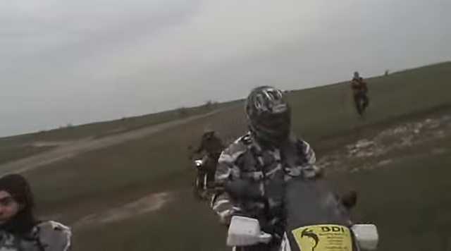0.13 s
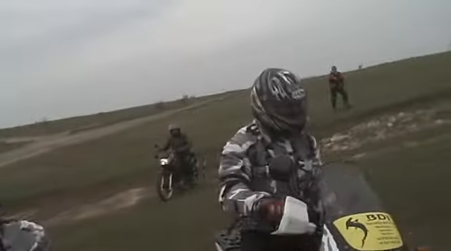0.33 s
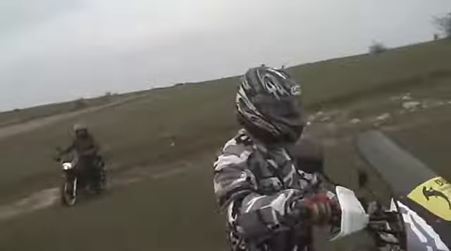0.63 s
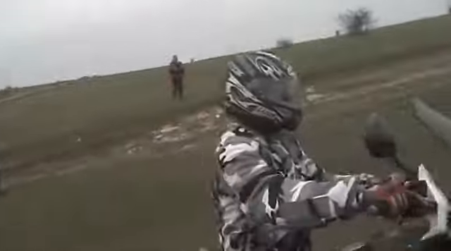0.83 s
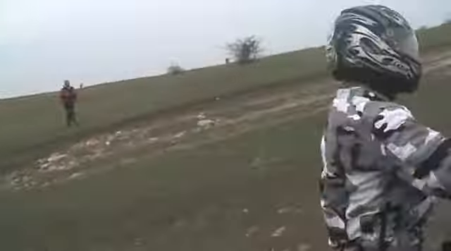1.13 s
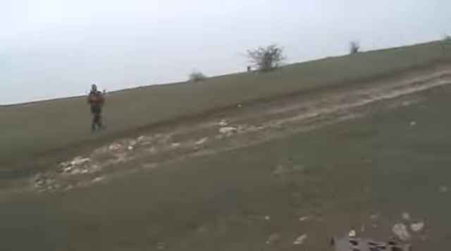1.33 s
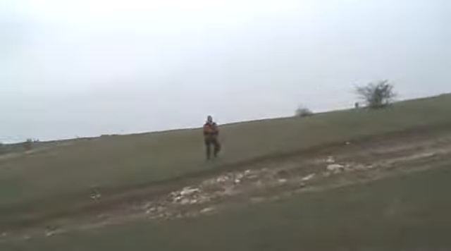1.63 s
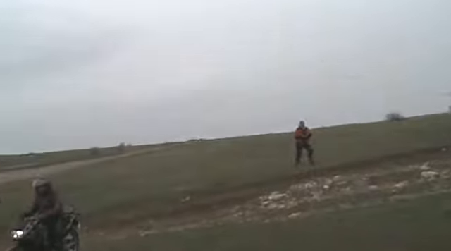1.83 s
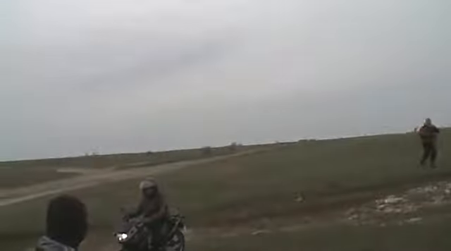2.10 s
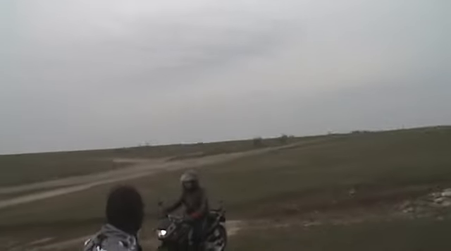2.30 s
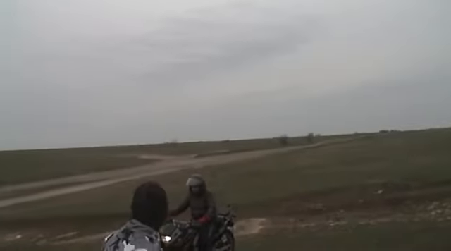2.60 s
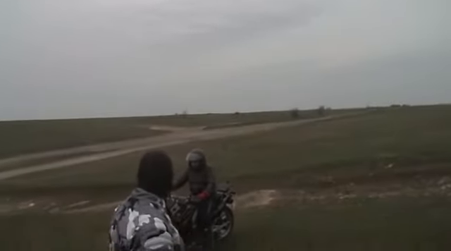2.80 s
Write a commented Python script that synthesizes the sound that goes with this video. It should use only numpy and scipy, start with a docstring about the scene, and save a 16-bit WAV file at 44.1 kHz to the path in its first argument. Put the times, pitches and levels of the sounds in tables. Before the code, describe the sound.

Slow single-cylinder motorbike chugging by in open country, with heavy gusts thumping and flapping the mic

```python
"""A single-cylinder motorcycle rolls past at a slowing idle on an open dirt track, other engines droning behind.
Each firing rings the exhaust pipe and swells a rasp of coloured noise; a narrow band rings, and ticks rattle.
Gusty wind buffets a small bare microphone: noise makes the low rumble and the fluttering eddies,
short swings make the flaps, and coloured clicks stand for the input overloading in the strongest gusts.
A faint hiss near 8 kHz, made of noise, lies in the background."""
import sys
import numpy as np
from scipy import signal
from scipy.fft import rfft, irfft, next_fast_len
from scipy.io import wavfile
from scipy.ndimage import uniform_filter1d

SR = 44100
rng = np.random.default_rng(int(sys.argv[2]) if len(sys.argv) > 2 else 0)


def to_wav(s):
    """Save 16-bit WAV."""
    ch = np.atleast_2d(s).T  # columns
    pcm = np.round(np.clip(ch, -1, 1) * 32767)  # PCM
    wavfile.write(sys.argv[1], SR, pcm.astype(np.int16))


def level_to_linear(level):
    """Convert decibel levels to linear amplitude factors, elementwise."""
    exponent = np.asarray(level, float) / 20
    return 10 ** exponent


N = 130095  # length in samples

# the bike passing, and the background hiss:
# time_s, thump_db, rasp_db, treble_db, background_hiss_db (levels before the trims added in use)
LEVELS = [(0.0, -46, -50.5, -61, -58), (0.19, -27, -51.5, -66.5, -64.5), (0.34, -27, -49, -70.5, -65),
          (0.51, -27, -44.5, -58, -63.5), (0.71, -27, -44.5, -59, -62.5), (0.93, -29, -42, -61.5, -62),
          (1.18, -27, -45, -60, -62.5), (1.39, -26.5, -43.5, -64, -58), (1.53, -26, -46.5, -57.5, -56.5),
          (1.71, -32, -45.5, -54.5, -65), (1.86, -26, -49, -56.5, -65.5),
          (2.09, -36.5, -51.5, -55.5, -65.5), (2.32, -35, -54, -56.5, -72), (2.72, -17, -54, -62, -66.5),
          (2.85, -28.5, -55.5, -62.5, -64.5), (2.95, -45, -53, -63, -64)]


def rms_one(x):
    """Scale a signal to an average strength (rms) of 1."""
    return x / np.sqrt(np.mean(x ** 2) + 1e-20)


def in_time(rows):
    """Draw straight lines between the rows of a table: one curve per column after the time."""
    time_s, *columns = np.transpose(rows)
    return [np.interp(np.arange(N) / SR, time_s, column) for column in columns]


def drift(rate_hz):
    """Random wandering of spread 1: noise smoothed twice, made at a twentieth of the sample rate."""
    r = np.exp(-40 * np.pi * rate_hz / SR)
    noise = rng.standard_normal(N // 20 + 3002)
    slow = signal.lfilter([1], [1, -2 * r, r * r], noise)[3000:]  # leave out the settling
    return np.interp(np.arange(N) / 20, np.arange(len(slow)), rms_one(slow))


def colour(x, spectrum):
    """Give a sound the spectrum of a table, falling steeply beyond its ends; white noise keeps rms 1."""
    size = next_fast_len(N + SR // 2)
    hz = np.maximum(np.arange(size // 2 + 1) * SR / size, 1)
    table_hz, level_db = np.transpose(spectrum)
    octaves_beyond = np.log2(np.maximum(hz / table_hz[-1], 1) * np.maximum(table_hz[0] / hz, 1))
    gain_db = np.interp(np.log(hz), np.log(table_hz), level_db) - 13.9 * octaves_beyond
    return irfft(rfft(x, size) * rms_one(level_to_linear(gain_db)), size)[:N]


def clicks(time_s, sizes):
    """Place single samples at given times; the tiny value elsewhere is inaudible."""
    out = np.full(N, 1e-18)
    i = (np.asarray(time_s) * SR).astype(int)
    inside = (i >= 0) & (i < N)
    out[i[inside]] = np.asarray(sizes)[inside]
    return out


def ring(x, hz, t60_s):
    """A resonance: a click of size 1 sets a sine of height 1 ringing, 60 dB weaker after t60_s."""
    r, w = level_to_linear(-60 / (t60_s * SR)), 2 * np.pi * hz / SR
    return signal.lfilter([0, np.sin(w)], [1, -2 * r * np.cos(w), r * r], x)


def band(x, low_hz, high_hz):
    """Pass only one band; a click of size 1 comes out with height 1."""
    sos = signal.butter(2, [low_hz, high_hz], "band", fs=SR, output="sos")
    height = np.max(np.abs(signal.sosfilt(sos, signal.unit_impulse(500))))
    return signal.sosfilt(sos, x) / height


def evened(x, span_s, share):
    """Take out a share of the chance swings of level over a span, and scale to rms 1."""
    size = int(span_s * SR)
    power = uniform_filter1d(uniform_filter1d(rms_one(x) ** 2, size), size)
    return rms_one(x / (power + .05) ** (share / 2))


def firings():
    """One click per firing of the cylinder, at ever longer intervals with slight chance in time and size."""
    k = np.arange(-6, 24)  # counted from the firing at 0.482 s
    chance = rng.normal(0, 1, (len(k), 2))
    # each interval is 2 * slowing_s longer than the one before
    first_s, period_s, slowing_s = .482, .0868, .00102
    jitter_s, spread_db = .002, 0.5
    time_s = first_s + k * (period_s + slowing_s * k) + jitter_s * chance[:, 0]
    return clicks(time_s, level_to_linear(spread_db * chance[:, 1]))


def exhaust_thump(blows):
    """Each firing strikes the air in the exhaust pipe, which rings at its own pitches; rms 1."""
    # ways the pipe rings: pitch_hz, level_db (relative), t60_s
    pipe = [(47.6, 2, 0.033), (90.34, 0.5, 0.36), (109, -5.5, 0.15), (149.4, -25.5, 0.51)]
    return rms_one(sum(level_to_linear(db) * ring(blows, hz, t60_s) for hz, db, t60_s in pipe))


def puff_shapes(blows):
    """A smooth bump of height about 1 around each firing, to move the level of the noise."""
    width_s = 0.015
    t = np.arange(-4 * width_s, 4 * width_s, 1 / SR)
    return signal.fftconvolve(blows, np.exp(-.5 * (t / width_s) ** 2), "same")


def engine_rasp(puffs, rasp_db):
    """Flickering noise for the drone of the engines, with casing resonances and a puff of hiss per firing."""
    # colour of the rasp: pitch_hz, level_db (relative, per Hz)
    rasp_colour = [(250, -12), (400, -6), (600, 0), (800, -5.5), (1050, -7.5), (1400, -8.5), (1800, -12),
                   (2200, -13), (2700, -19), (3300, -28.5), (4500, -33.5)]
    # casing resonances: pitch_hz, width_hz, level_db (when the rasp is strongest),
    # extra_db (further change for each dB that the rasp changes)
    casing = [(1450, 160, -12, .1), (2250, 250, -14, .3)]
    body = colour(rng.standard_normal(N) * level_to_linear(1.6 * drift(120)), rasp_colour)
    for hz, width_hz, db, extra_db in casing:
        resonance = rms_one(ring(rng.standard_normal(N), hz, 1.3 / width_hz))
        body = body + level_to_linear(db + extra_db * (rasp_db - rasp_db.max())) * resonance
    puff_gain = 1 + puffs * (level_to_linear(3) - 1)  # about 3 dB louder at each firing
    return body * puff_gain * level_to_linear(rasp_db + 4.5 + 1.6 * drift(25))


def flickering_noise(puffs):
    """White noise that flickers in level and dips very slightly at each firing."""
    return rng.standard_normal(N) * level_to_linear(2.0 * drift(60)) * (1 + puffs * (level_to_linear(-0.5) - 1))


def engine_treble(noise, treble_db):
    """The bright part of the engine: flickering noise given the colour of the treble."""
    # colour of the treble: pitch_hz, level_db (relative, per Hz)
    treble_colour = [(3300, 5), (4500, -1), (5500, -4.5), (6300, -13), (7200, -8)]
    return colour(noise, treble_colour) * level_to_linear(treble_db - 1.6)


def exhaust_barks():
    """A harder, brighter bark of the exhaust: coloured noise that rises, holds and dies away quickly."""
    # barks: start_s, hold_s (from the start, rise included), level_db
    bark_times = [(0.831, 0.024, -33), (0.918, 0.017, -46), (1.024, 0.014, -43.5), (1.337, 0.017, -48)]
    # colour of a bark: pitch_hz, level_db (relative, per Hz)
    bark_colour = [(500, -10), (900, 2.5), (1600, 1.5), (2500, -5.5), (3800, -12.5), (5000, -33),
                   (8500, -25)]
    attack_s, release_s = 0.0038, .005
    t = np.arange(N) / SR
    level = np.zeros(N)
    for start_s, hold_s, db in bark_times:
        rise = np.clip((t - start_s) / attack_s, 0, 1)
        decay = np.exp(-np.maximum(t - start_s - hold_s, 0) / release_s)
        level += level_to_linear(db) * rise * decay
    return level * colour(rng.standard_normal(N), bark_colour)


def engine(blows, puffs, noise):
    """Thump, rasp and treble, whose levels follow the bike passing, and the barks."""
    thump_db, rasp_db, treble_db, _ = in_time(LEVELS)
    thump = exhaust_thump(blows) * level_to_linear(thump_db + 1.5)
    return thump + engine_rasp(puffs, rasp_db) + engine_treble(noise, treble_db) + exhaust_barks()


def ringing():
    """A narrow ringing band and one above it: slow noise swings the strength and phase of two moving tones."""
    # loudest beside the microphone, sinking as the bike leaves: time_s, level_db, pitch_hz
    ringing_path = [(0, -53, 830), (.42, -41, 827.8), (.52, -41, 830), (.57, -37, 865), (.63, -39.5, 880),
                    (.7, -40, 900), (.77, -38.5, 845), (.85, -39, 830), (.89, -54, 807.6),
                    (.92, -32.5, 850.5), (.96, -39, 816.4), (1.0, -49, 799.5), (1.04, -34.5, 884.4),
                    (1.09, -45.5, 782.3), (1.15, -37.5, 789), (1.2, -65, 761), (1.245, -44.5, 737),
                    (1.3, -57, 739.5), (1.36, -39, 725), (1.42, -54.5, 717.6), (2.95, -58, 693.5)]
    level_db, hz = in_time(ringing_path)
    out = 0
    for ratio, db in ((1, 0), (1.97, -9)):  # pitch ratio, level in dB relative to the first
        turn = 2 * np.pi * ratio * np.cumsum(hz) / SR
        rate_hz = 54 * ratio  # speed of the swings: faster makes a wider band
        tone = drift(rate_hz) * np.cos(turn) + drift(rate_hz) * np.sin(turn)
        out = out + level_to_linear(db) * evened(tone, .025, 0.34)
    return out * level_to_linear(level_db)


def ticks():
    """Bright single ticks from the passing bike among a fainter regular rattle: clicks in a high band."""
    # ticks: time_s, peak_db (before 4.5 dB is added)
    tick_times = [(1.504, -38), (1.5295, -34.5), (1.5596, -32), (1.597, -59), (1.6736, -44), (1.6914, -47),
                  (1.712, -50)]
    time_s, peak_db = np.transpose(tick_times)
    beats_s = np.arange(1.45, 1.85, 1 / 54)  # 54 beats per second
    beat_db = -46 + 3.2 * rng.normal(0, 1, len(beats_s))
    rattle = clicks(beats_s, level_to_linear(beat_db))
    return band(clicks(time_s, level_to_linear(peak_db + 4.5)) + rattle, 5600, 9500)


def wind_rumble():
    """Wind pressing on the microphone: low noise whose level rises and falls in lumps."""
    # gusts: time_s, level_db
    gusts = [(0.0, -18.5), (0.06, -26), (0.11, -21.5), (0.16, -23), (0.25, -25), (0.31, -20.5), (0.34, -17),
             (0.43, -21), (0.46, -15), (0.52, -14.5), (0.6, -24), (0.67, -18), (0.74, -18.5), (0.8, -24),
             (0.85, -24.5), (0.89, -16), (0.93, -17), (0.98, -22), (1.04, -16.5), (1.13, -15), (1.19, -20),
             (1.27, -20), (1.34, -15.5), (1.4, -24), (1.45, -18.5), (1.51, -24.5), (1.56, -17),
             (1.62, -21.5), (1.73, -18), (1.78, -23.5), (1.85, -18.5), (1.9, -13), (1.98, -22), (2.08, -16),
             (2.16, -16), (2.21, -7.5), (2.28, -9), (2.34, -15.5), (2.38, -17.5), (2.46, -10.5),
             (2.54, -16), (2.6, -13.5), (2.65, -14.5), (2.7, -9.5), (2.77, -17.5), (2.83, -12.5),
             (2.87, -19), (2.89, -13), (2.92, -34), (2.95, -4)]
    # colour of the rumble: pitch_hz, level_db (relative, per Hz)
    rumble_colour = [(4, -4), (6, -1.5), (15, -6.5), (35, -6), (70, -12.5), (120, -17.5), (160, -24),
                     (200, -29)]
    level_db, = in_time(gusts)
    rumble = evened(colour(rng.standard_normal(N), rumble_colour), 0.043, 0.54)
    return rumble * level_to_linear(level_db + 1.03 * drift(2.6))


def wind_eddies():
    """Eddies shed at the microphone in swells and lulls: clumps of jolts and hiss, coloured into two bands."""
    # swells and lulls: time_s, flutter_db (before 1.5 dB is added), upper_db (before 3 dB is taken off)
    swells = [(0.0, -48.5, -59), (0.014, -41.5, -63), (0.026, -35.5, -33), (0.07, -21, -31.5),
              (0.086, -24.5, -45), (0.096, -30, -25.5), (0.144, -34, -32), (0.152, -28, -52),
              (0.176, -31, -53.5), (0.202, -27, -31.5), (0.256, -25.5, -30), (0.264, -37, -38.5),
              (0.274, -30, -24.5), (0.314, -27.5, -51.5), (0.33, -28, -21.5), (0.42, -24.5, -37),
              (0.43, -31, -59), (0.464, -22, -20.5), (0.48, -31, -55), (0.5, -24, -33), (0.51, -28.5, -51),
              (0.54, -45.5, -49), (0.56, -32.5, -39), (0.81, -31.5, -41.5), (0.828, -24, -46),
              (0.87, -34, -41), (0.884, -58, -41), (0.908, -31, -47), (0.928, -46, -58), (0.968, -36, -54),
              (1.052, -26.5, -58), (1.248, -38, -35.5), (1.27, -47, -36), (1.312, -55, -41),
              (1.332, -37, -36), (1.378, -52, -46), (1.404, -35, -56), (1.42, -38, -60), (1.6, -52, -41.5),
              (1.73, -47, -40), (1.78, -55, -32), (1.86, -41, -53), (1.88, -27.5, -49), (1.98, -42, -49),
              (2.04, -30, -62), (2.102, -28.5, -57), (2.108, -20.5, -49.5), (2.13, -18.5, -39.5),
              (2.202, -19, -19), (2.206, -37, -39.5), (2.264, -17, -31.5), (2.29, -27.5, -59),
              (2.312, -18, -26.5), (2.33, -32, -48), (2.344, -23, -21), (2.358, -22.5, -36),
              (2.396, -18, -39), (2.404, -23, -46), (2.42, -19.5, -34), (2.432, -23.5, -43),
              (2.468, -17.5, -29), (2.53, -28, -35), (2.538, -25, -51), (2.562, -24.5, -25.5),
              (2.61, -13.5, -22), (2.662, -19.5, -28.5), (2.676, -22.5, -17.5), (2.7, -21, -35.5),
              (2.71, -29, -14), (2.808, -18.5, -34), (2.824, -14.5, -32), (2.848, -15, -27.5),
              (2.86, -33, -44), (2.88, -17.5, -17), (2.898, -18, -38), (2.922, -22, -40), (2.942, -43, -48),
              (2.95, -18, -53)]
    # colour of the flutter: pitch_hz, level_db (relative, per Hz)
    flutter_colour = [(60, -1.5), (120, -2.5), (200, -5), (300, -8), (450, -15.5), (600, -34)]
    # colour of the upper flutter: pitch_hz, level_db (relative, per Hz)
    upper_colour = [(400, 3), (550, 2), (750, -3), (950, -10), (1200, -15.5), (1600, -33), (2500, -49)]
    eddies_per_s, spread_db = 500, 3
    flutter_db, upper_db = in_time(swells)
    clump = level_to_linear(1.2 * drift(37) + 3.02 * drift(160))
    sizes = level_to_linear(spread_db * np.minimum(rng.exponential(1, N), 2.5)) * rng.choice([-1, 1], N)
    jolts = rms_one(sizes * (rng.random(N) < eddies_per_s / SR))
    eddies = clump * (.72 * jolts + .6 * rng.standard_normal(N))
    flutter = evened(colour(eddies, flutter_colour), 0.02, 0.75) * level_to_linear(flutter_db + 1.5)
    upper = evened(colour(eddies, upper_colour), 0.016, 0.55) * level_to_linear(upper_db - 3.0)
    return flutter + upper


def flaps():
    """Sharp flaps of wind on the membrane: each is a swing of a cycle or two with a grain of grit."""
    # flaps: time_s (swing is strongest one width later), peak_db, pitch_hz, grit_db (relative to the peak)
    flap_times = [(0.067, -18.5, 567, -38), (0.097, -20.5, 670, -26), (0.124, -29, 620, -28),
                  (0.138, -28, 700, -28), (0.201, -22.5, 604, -24), (0.214, -19.5, 566, -34),
                  (0.232, -22, 600, -31.5), (0.249, -15.5, 625, -27), (0.275, -17, 715, -36),
                  (0.3, -23, 600, -32), (0.334, -23.5, 598, -14.5), (0.352, -43, 519, -25),
                  (0.377, -19, 765, -33), (0.396, -21, 740, -40), (0.462, -17, 545, -25),
                  (2.139, -15, 515, -26), (2.193, -16, 510, -23), (2.218, -12.5, 503, -32),
                  (2.309, -32, 501, -33), (2.342, -13.5, 500, -43.5), (2.413, -18, 528, -25),
                  (2.461, -18, 534, -34), (2.504, -21, 576, -20.5), (2.604, -9, 490, -42),
                  (2.672, -9.5, 490, -42), (2.681, -13, 530, -23), (2.702, -12.5, 506, -24),
                  (2.711, -9, 645, -32), (2.734, -15, 503, -22), (2.769, -12.5, 518, -34),
                  (2.825, -18, 604, -31), (2.844, -16.5, 620, -29), (2.877, -18, 600, -35),
                  (2.884, -25, 862, -20)]
    width_s, grit_width_s = .0013, .001
    out, t = np.zeros(N), np.arange(N) / SR
    grit = rms_one(band(rng.standard_normal(N), 1300, 2330))
    phases = rng.uniform(0, 2 * np.pi, len(flap_times))
    for (time_s, db, hz, grit_db), phase in zip(flap_times, phases):
        near = slice(int((time_s - .02) * SR), int((time_s + .03) * SR))
        dt = t[near] - time_s - width_s
        swing = np.exp(-.5 * (dt / width_s) ** 2) * np.sin(2 * np.pi * hz * dt + phase)
        grain = level_to_linear(grit_db) * np.exp(-.5 * (dt / grit_width_s) ** 2) * grit[near]
        out[near] += level_to_linear(db) * (swing + grain)
    return out


def overload_clicks():
    """Broadband clicks of the input overloading in the strongest gusts, placed by hand: coloured single samples."""
    # clicks: time_s (each sounds 0.64 ms later), peak_db
    overload_times = [(.3341, -42), (2.196, -22.5), (2.6053, -35), (2.68, -26.5), (2.7022, -39),
                      (2.7126, -19.5), (2.7363, -18), (2.844, -27.5), (2.8856, -36)]
    # colour of a click: pitch_hz, level_db (relative, per Hz)
    click_colour = [(900, 2.5), (1500, 8.5), (2500, -2.5), (3500, -17), (5000, -16), (8500, -26)]
    time_s, peak_db = np.transpose(overload_times)
    height = colour(clicks([1], [1]), click_colour).max()  # of a click of size 1
    sizes = level_to_linear(peak_db) * rng.choice([-1, 1], len(time_s))
    return colour(clicks(time_s + 0.00064, sizes), click_colour) / height


def snicks():
    """Faint thin clicks in the first gust: single samples through a band-pass."""
    # snicks: time_s, peak_db (before 1 dB is added)
    snick_times = [(.013, -41), (.0662, -52), (0.0935, -44), (.1161, -42)]
    time_s, peak_db = np.transpose(snick_times)
    return band(clicks(time_s, level_to_linear(peak_db + 1.0)), 2300, 5000)


def background_hiss(noise):
    """Faint hiss near 8 kHz, a background floor apart from the engine's treble: noise given a narrow colour."""
    # colour of the hiss: pitch_hz, level_db (relative, per Hz)
    hiss_colour = [(7000, -11.5), (7500, -10), (8100, -5), (8700, 3)]
    hiss_db = in_time(LEVELS)[-1]
    return colour(noise, hiss_colour) * level_to_linear(hiss_db + 6.5)


def scene():
    """Add all sources at one microphone; the treble and the background hiss are cut from the same noise."""
    blows = firings()
    puffs = puff_shapes(blows)
    noise = flickering_noise(puffs)
    bike = engine(blows, puffs, noise) + ringing() + ticks()
    wind = wind_rumble() + wind_eddies() + flaps()
    return (bike + wind + overload_clicks() + snicks() + background_hiss(noise))[None]


def band_limit(x):
    """A steep low-pass at the top of the band."""
    return signal.sosfilt(signal.butter(12, 9710, fs=SR, output="sos"), x)


def record(dry):
    """The top is cut steeply, the input overloads with a short knee, and the last instant fades."""
    clip_level, knee, fade_s = .71, 12, .004  # a higher knee bends more sharply
    cut = signal.sosfilt(signal.cheby2(16, 60, 9000, fs=SR, output="sos"), dry)  # 60 dB down from 9 kHz
    clipped = cut / (1.5 + np.abs(cut / clip_level) ** knee) ** (1 / knee)
    fade = np.minimum(np.arange(N)[::-1] / (fade_s * SR), 1)
    return band_limit(clipped * fade)


dry = scene()
out = record(dry)
to_wav(out)
```